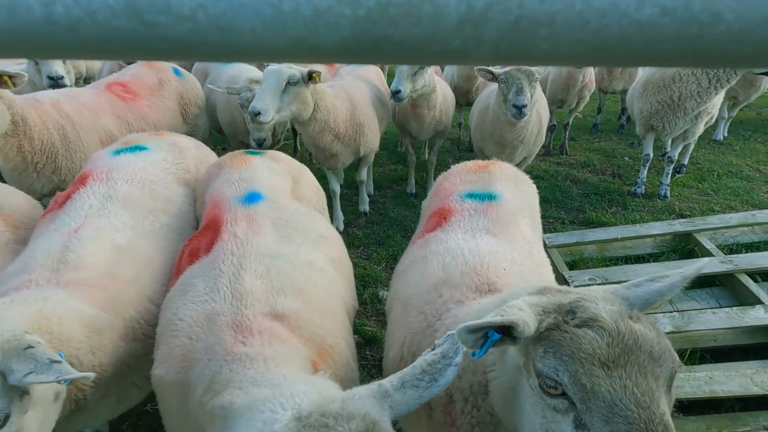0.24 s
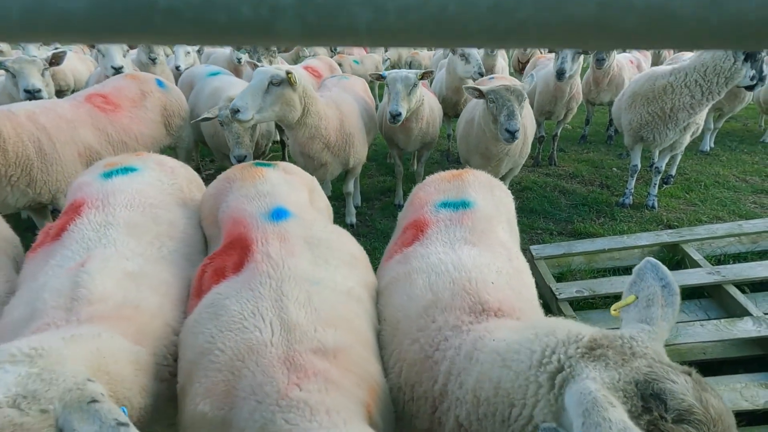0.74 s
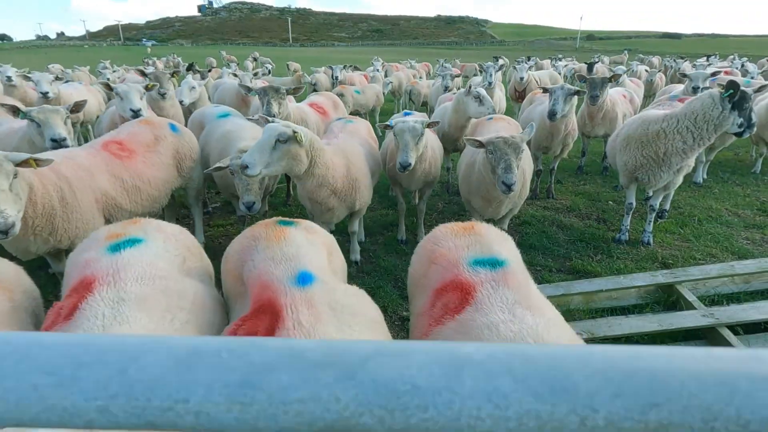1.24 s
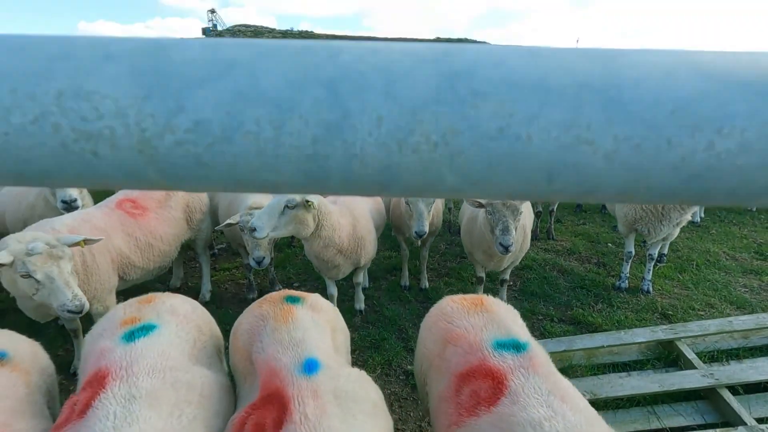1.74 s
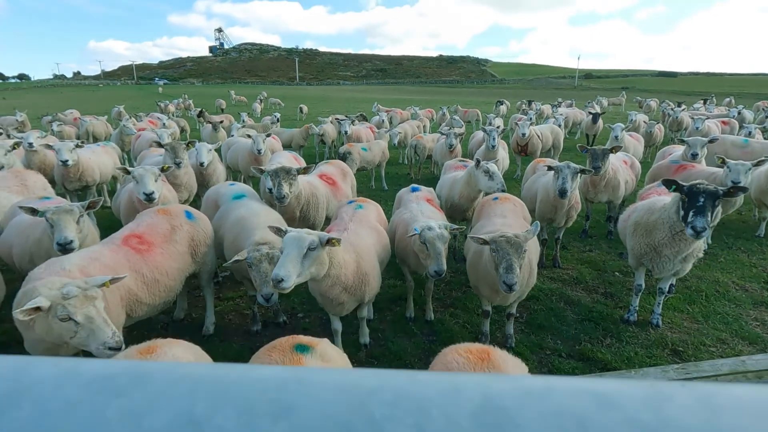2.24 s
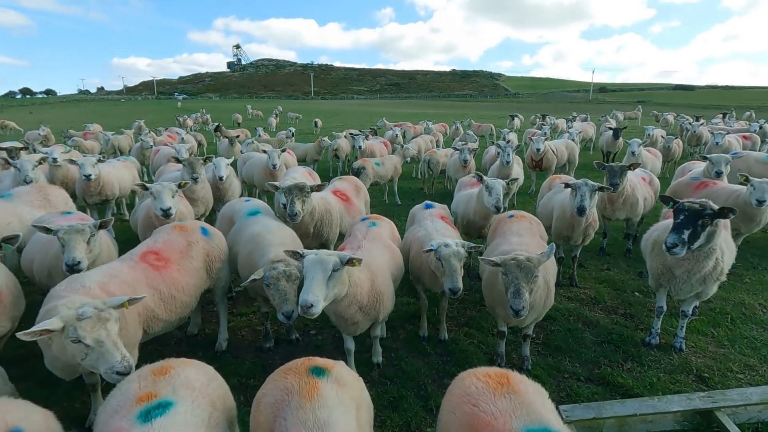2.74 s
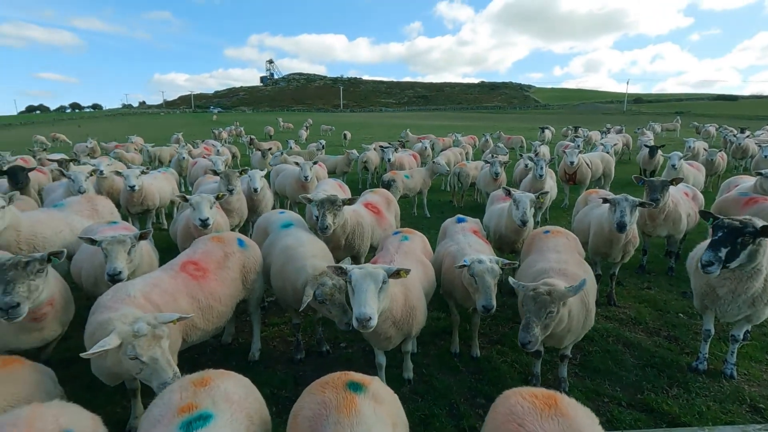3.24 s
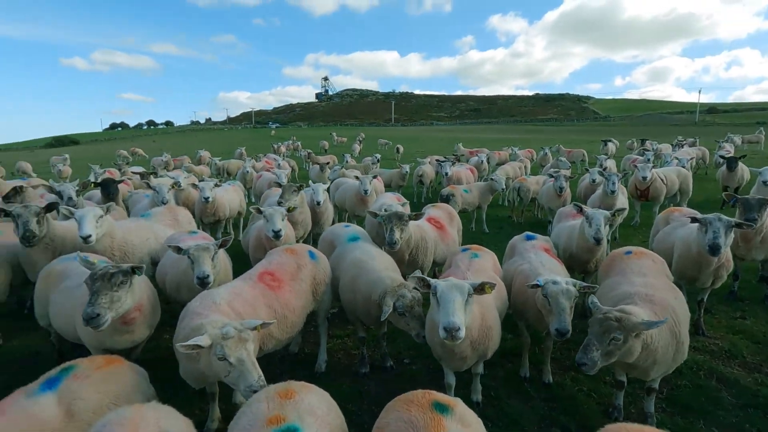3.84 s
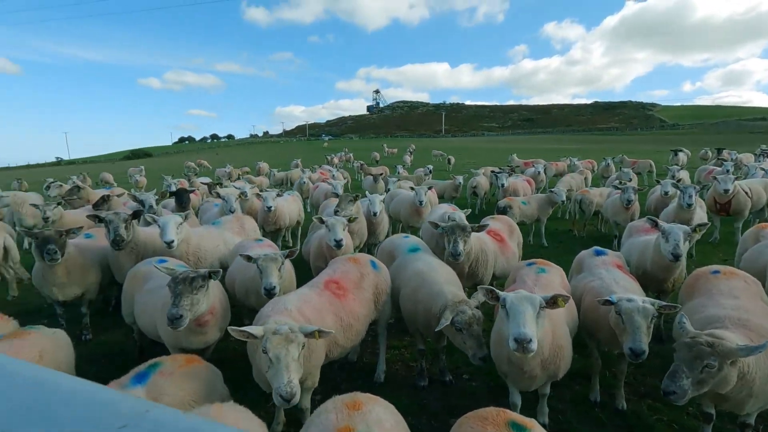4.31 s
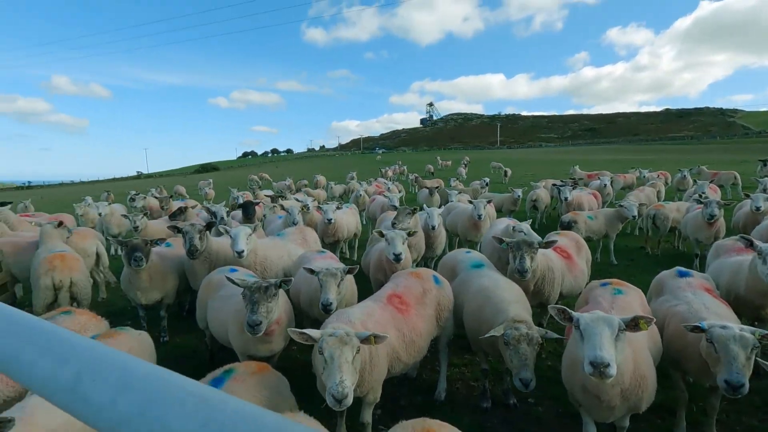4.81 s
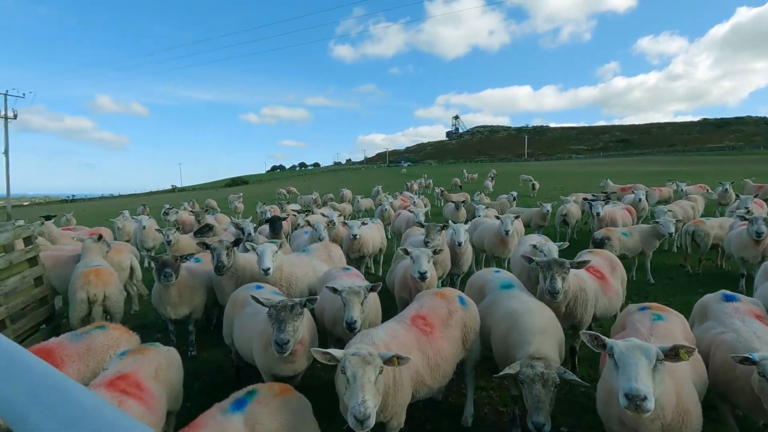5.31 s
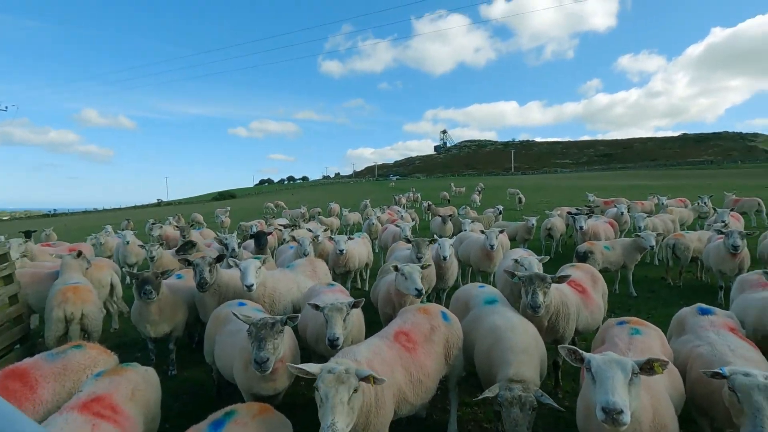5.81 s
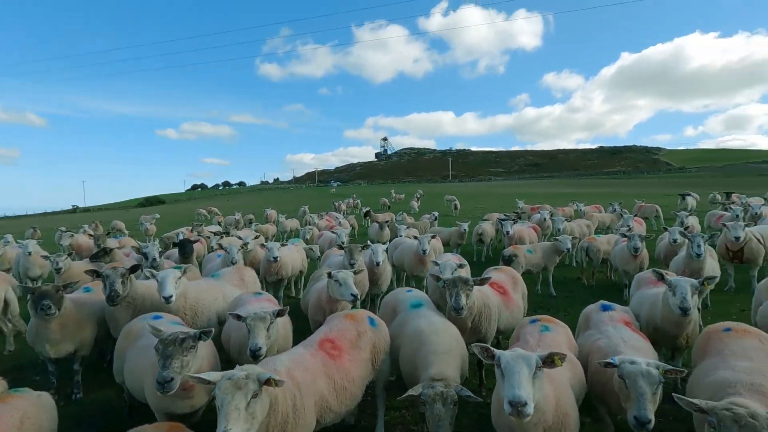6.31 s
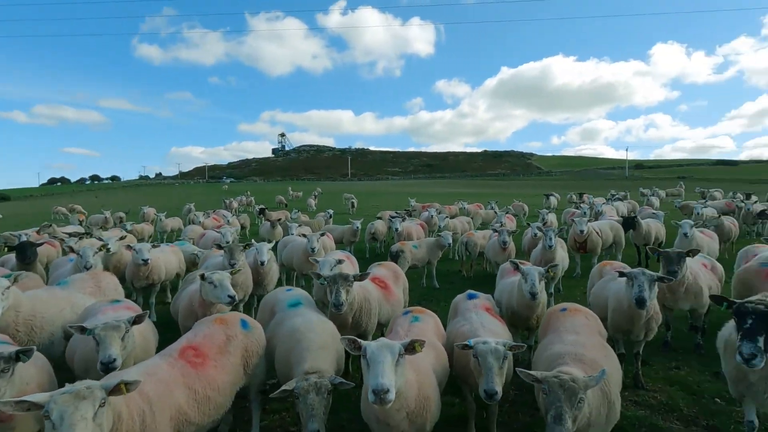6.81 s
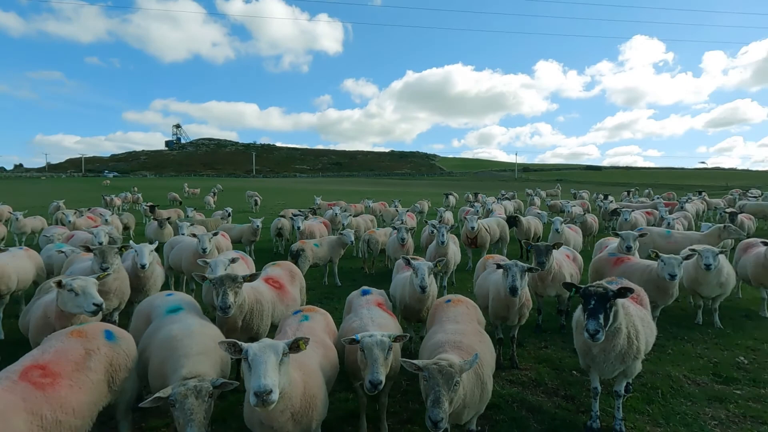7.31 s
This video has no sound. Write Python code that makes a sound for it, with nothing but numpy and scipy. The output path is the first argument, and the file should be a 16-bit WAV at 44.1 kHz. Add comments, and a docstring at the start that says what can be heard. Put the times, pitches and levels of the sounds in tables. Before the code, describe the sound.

Low buffeting wind swells into a hard blow, drops away and returns, over soft fleece rustle, tiny snaps and hooves knocking on ground and wood.

```python
"""A flock of sheep mills about on a pasture in gusty wind.
From the start, noise pressed on two ports rumbles and sputters; grainy noise rustles as fleece and grass,
dull far steps patter over a field wash, and short noise cracks snap as stalks.
Hoof knocks (struck modes) join from 0.3 s, pause after 3.4 s and return at 5.6 s; scuffs join at 0.6 s.
The wind builds to a long blow at 3.3-4.5 s, dies away by 5.6 s and picks up again."""
import sys
import numpy as np
from scipy import signal
from scipy.fft import rfft, irfft, next_fast_len
from scipy.io import wavfile
from scipy.ndimage import uniform_filter1d

SR = 44100
rng = np.random.default_rng(int(sys.argv[2]) if len(sys.argv) > 2 else 0)


def dump(signal):
    """Clip the signal to [-1, 1] and save it as 16-bit WAV at the path in sys.argv[1]."""
    limited = np.clip(np.atleast_2d(signal).T, -1, 1)
    pcm = np.round(limited * 32767).astype(np.int16)
    wavfile.write(sys.argv[1], SR, pcm)


N = 332955
TIME = np.arange(N) / SR
SIDES = np.array([[.5], [-.5]])  # left and right halves of a left-right difference

# Levels in the tables are relative: the functions trim them.
# slow wind: t/s, buffeting/dB, rumble/dB, extra on the rumble's upper part/dB
WIND = [(0.0, -49.5, -26, -1), (0.65, -48.5, -25.5, -0.5), (1.35, -49, -26, -1), (1.95, -42, -28, 2.5),
        (2.12, -54.5, -20, -5), (2.5, -45.5, -17, -9.5), (2.9, -38, -23.5, -2), (3.3, -28.5, -19, 1),
        (3.7, -28.5, -16.5, -3), (4.45, -33, -19.5, -0.5), (4.85, -38.5, -23, -2.5),
        (5.4, -45.5, -25, -3.5), (5.55, -67, -28.5, 4.5), (6.03, -63, -29.5, -4.5),
        (6.18, -41.5, -26, -0.5), (6.65, -38.5, -21.5, 1), (7.15, -39.5, -25, -2), (7.5, -39, -14, -15)]
# puffs on the wind: middle t/s, length/s, buffeting/dB, rumble/dB
PUFFS = [(0.125, 0.074, -35.5, -12.5), (0.276, 0.034, -40.5, -27), (0.398, 0.036, -40, -18),
         (0.494, 0.033, -33.5, -17.5), (0.722, 0.016, -39, -16.5), (0.788, 0.039, -43.5, -50),
         (0.884, 0.25, -45, -48), (1.012, 0.11, -46.5, -19.5), (1.111, 0.052, -42.5, -25),
         (1.226, 0.064, -33.5, -48), (1.443, 0.066, -31.5, -20), (1.642, 0.057, -29.5, -28),
         (2.25, 0.12, -40, -42), (2.553, 0.067, -32, -25), (2.77, 0.11, -32.5, -21),
         (3.009, 0.1, -26, -16.5), (3.111, 0.081, -34, -32), (5.406, 0.093, -41.5, -17),
         (5.601, 0.047, -34.5, -24.5), (5.735, 0.029, -50, -21), (5.87, 0.051, -45.5, -15.5),
         (6.132, 0.052, -35.5, -55), (6.309, 0.14, -35.5, -22.5), (6.807, 0.041, -42.5, -19)]
# brief lulls: middle t/s, length/s, depth/dB (negative: a rise)
LULLS = [(0.31, 0.11, 13), (0.631, 0.04, 26), (1.707, 0.024, 22.5), (3.199, 0.036, 18.5),
         (3.472, 0.042, 3.5), (3.731, 0.013, -3.5), (3.826, 0.018, 4), (3.878, 0.029, 2.5),
         (4.059, 0.022, 4.5), (4.141, 0.031, 3.5), (4.286, 0.019, 12.5), (4.387, 0.032, 2.5),
         (4.435, 0.02, 6), (4.589, 0.086, 25.5), (5.184, 0.035, 21.5), (5.538, 0.098, 22.5),
         (5.797, 0.056, 23.5), (6.398, 0.059, 30.5), (6.798, 0.016, 17.5), (6.937, 0.035, 0),
         (7.263, 0.025, 0)]
# side the rumble presses on, right to left and back: t/s, left-right/dB
WIND_SIDE = [(0.0, -3), (2.3, -2.5), (4.0, -0.5), (4.8, 4), (7.5, -1)]
# rumble spectrum: f/Hz, level/dB per Hz
RUMBLE_COLOUR = [(8, -16.5), (20, -1), (33, -1.5), (55, -3), (85, -6.5), (130, -14.5), (200, -20.5),
                 (350, -60), (700, -99)]
# share of each pitch counted as the rumble's upper part: f/Hz, share/1
RUMBLE_UPPER = [(45, 0), (90, 1)]
# single strong eddies: t/s, peak level/dB, decay/s
EDDIES = [(0.004, -26.5, 0.01), (0.074, -26.5, 0.012), (0.123, -21, 0.016), (0.234, -25, 0.015),
          (0.255, -22.5, 0.006), (0.41, -34, 0.01), (0.457, -23.5, 0.022), (0.494, -33, 0.046),
          (0.778, -23.5, 0.0037), (1.421, -27.5, 0.041), (1.456, -26, 0.011), (1.488, -22.5, 0.004),
          (1.527, -26.5, 0.0089), (1.842, -21.5, 0.0095), (1.986, -28.5, 0.045), (2.269, -23, 0.0068),
          (2.514, -23.5, 0.013), (2.739, -22, 0.011), (2.767, -24.5, 0.01), (2.971, -19.5, 0.006),
          (2.986, -16, 0.0065), (3.108, -21, 0.013), (3.216, -18.5, 0.0063), (3.247, -15.5, 0.017),
          (3.272, -11.5, 0.0071), (3.291, -17.5, 0.011), (3.327, -22, 0.021), (3.351, -16.5, 0.0061),
          (3.431, -25.5, 0.011), (3.5, -13, 0.012), (3.549, -16, 0.0063), (3.566, -18, 0.036),
          (3.613, -11.5, 0.0087), (3.663, -17, 0.011), (3.687, -10, 0.0051), (3.737, -13, 0.005),
          (3.781, -3.5, 0.0055), (3.807, -12.5, 0.0078), (3.85, -12.5, 0.0046), (3.899, -14, 0.0033),
          (3.921, -17.5, 0.013), (3.959, -16.5, 0.008), (3.987, -18, 0.023), (4.04, -18.5, 0.004),
          (4.048, -16.5, 0.005), (4.08, -15.5, 0.0062), (4.107, -16.5, 0.0026), (4.148, -9, 0.004),
          (4.166, -21, 0.02), (4.223, -15.5, 0.0037), (4.273, -18.5, 0.007), (4.325, -19, 0.0033),
          (4.34, -15, 0.007), (4.397, -15.5, 0.0089), (4.449, -18, 0.012), (4.72, -18.5, 0.01),
          (4.745, -24, 0.039), (4.841, -28.5, 0.033), (4.917, -28.5, 0.03), (5.104, -21.5, 0.0071),
          (5.142, -12.5, 0.0062), (5.21, -20.5, 0.0091), (5.236, -28.5, 0.0092), (5.306, -25, 0.027),
          (5.574, -22.5, 0.0087), (5.758, -27.5, 0.0062), (6.137, -25, 0.0044), (6.274, -27.5, 0.0087),
          (6.291, -39.5, 0.0057), (6.338, -22.5, 0.0065), (6.606, -23, 0.015), (6.644, -25, 0.0046),
          (6.676, -25, 0.009), (6.716, -19, 0.012), (6.789, -17.5, 0.0059), (6.81, -17.5, 0.007),
          (6.838, -18.5, 0.012), (6.87, -19.5, 0.011), (6.95, -24.5, 0.0087), (6.97, -23, 0.0077),
          (7.102, -22, 0.0092), (7.131, -24.5, 0.018), (7.174, -19, 0.026), (7.266, -21, 0.0054)]
# buffeting spectrum: f/Hz, level/dB per Hz
GUST_COLOUR = [(40, -15), (70, 13), (110, 8), (180, 8.5), (300, 5.5), (500, -1.5), (750, -10.5),
               (1100, -22.5), (1600, -39.5), (2300, -53), (3300, -66), (6000, -87)]
# how strongly each pitch follows the gusts: f/Hz, slope/(dB per dB)
GUST_GRIP = [(100, 0.85), (250, 0.4452), (500, 1), (1000, 2.06), (2000, 2.5)]
# port level difference in gusts: f/Hz, left-right/dB
GUST_BALANCE = [(100, -2.5), (200, -5), (500, -6), (750, -5.5), (1140, 0), (1740, 1), (2650, 4.5)]
# port phase difference in gusts: f/Hz, left lead/rad
GUST_PHASE = [(80, -1.45), (180, -1.49), (1200, -1.55), (2600, -1.3)]
# stirring of the flock: t/s, rustle level/dB
STIR = [(0.0, -66.5), (0.9, -67), (1.7, -70.5), (2.45, -72.5), (3.55, -71), (4.05, -73.5), (4.6, -66),
        (5.2, -75.5), (5.6, -72), (6.9, -77), (7.5, -78.5)]
# single brushes of fleece and grass: middle t/s, length/s, level/dB, crispness (treble)/dB
BRUSHES = [(0.154, 0.08, -60, -2), (0.542, 0.13, -81, 19), (0.83, 0.24, -63.5, -12), (1, 0.17, -62, -15),
           (1.22, 0.18, -63, 1), (1.946, 0.035, -61, -5), (2.762, 0.087, -68, -24), (3.055, 0.07, -60, -8),
           (3.252, 0.04, -62.5, -4), (4.132, 0.03, -59.5, -27), (4.46, 0.048, -67, -13),
           (5.024, 0.27, -64.5, -18), (5.34, 0.23, -67, 2), (5.96, 0.26, -67, -7), (6.206, 0.14, -69, 1),
           (6.537, 0.087, -71, -6), (7.077, 0.18, -71.5, -19)]
# rustle spectrum: f/Hz, level/dB per Hz
RUSTLE_COLOUR = [(200, 14), (600, -4), (1300, 11.5), (2000, 7), (3000, 3), (5000, 3.5), (7000, 0.5),
                 (8500, -8.5), (12000, -15.5), (14000, -38)]
# share of each pitch counted as the rustle's top: f/Hz, share/1
RUSTLE_TOP = [(7000, 0.039), (9500, 0.46)]
# distant steps, spectrum: f/Hz, level/dB per Hz
TREAD_COLOUR = [(150, -9.5), (500, -22), (1200, 16), (2000, 8), (3000, -29), (6000, -33)]
# open field wash, spectrum: f/Hz, level/dB per Hz
FIELD_COLOUR = [(100, -15), (500, 15), (1000, 12.5), (1500, 8.5), (2500, -2), (4000, -35.5), (7000, -8),
                (9000, -35), (14000, -29)]
# stalks and grit snapping underfoot: t/s, peak level/dB, centre f/Hz, decay/s
SNAPS = [(0.0155, -38, 5300, 0.01), (0.158, -42, 5940, 0.003), (0.348, -33, 8200, 0.00091),
         (0.4324, -42, 7000, 0.003), (0.442, -41.5, 5000, 0.007), (0.459, -43, 7000, 0.0022),
         (0.648, -42, 5980, 0.004), (1.017, -42, 5760, 0.0093), (1.191, -40, 6500, 0.007),
         (1.686, -49, 5800, 0.0045), (1.8315, -50, 6200, 0.0027), (1.911, -48, 6550, 0.005),
         (1.9544, -48, 6000, 0.004), (2.102, -53.5, 6630, 0.0057), (2.617, -44, 6460, 0.0032),
         (3.2444, -51, 6240, 0.004), (3.753, -48, 9780, 0.0063), (3.891, -47.5, 7000, 0.011),
         (4.123, -52, 6430, 0.004), (4.23, -37.5, 6300, 0.0028), (4.312, -42, 5700, 0.0034),
         (4.4025, -47, 5800, 0.004), (4.616, -44, 7000, 0.002), (4.6558, -48, 6740, 0.003),
         (4.7144, -43, 5740, 0.0048), (4.815, -50, 5200, 0.003), (4.946, -37.5, 4470, 0.004),
         (5.313, -44, 5700, 0.004), (5.9744, -45, 7210, 0.004), (7.2399, -51, 7200, 0.002)]
# hoof knocks: t/s, level/dB, main ring f/Hz, upper ring f/Hz, upper ring level/dB, gritty clack level/dB,
# wooden slats level/dB, ring length factor/1, rocking time/s, left-right/dB
HOOVES = [(0.286, -52, 1500, 2260, -11, -8, -11, 0.71, 0.0014, 9),
          (0.3035, -49.5, 1300, 1790, -17, -16, -16, 1.6, 0.00093, 7),
          (0.591, -48, 1420, 2120, -14, -25, -8, 0.61, 0.0004, 1),
          (0.684, -59, 3300, 5300, 17, 0, -16, 1.0, 0.00081, -2),
          (0.72, -51, 1840, 2400, -11, -21, -14, 0.99, 0.0004, 1),
          (0.7496, -45, 1820, 2480, -10, -25, -16, 1.1, 0.0005, 1),
          (0.808, -39, 1220, 1850, 11, -29, -24, 1.4, 0.00053, 1),
          (0.973, -41, 1590, 2620, -13, -25, -26, 1.1, 0.0014, -2),
          (1.231, -47, 1640, 2160, 2, -18, -17, 0.92, 0.0021, -1),
          (1.5401, -43, 1650, 1950, -9, -12, -4, 0.37, 0.00085, -1),
          (1.5641, -36.5, 1480, 1890, -6, -13, -11, 0.4, 0.00033, 1),
          (1.622, -37, 1680, 2350, -20, -25, -19, 0.83, 0.0003, -0.5),
          (1.656, -30, 1790, 2400, -16, -16, -7, 0.75, 0.0012, 0.5),
          (2.103, -58, 2900, 3400, -2, 8, -13, 0.62, 0.002, 14),
          (2.1502, -48.5, 1710, 2940, 17, -14, -1.5, 0.16, 0.0026, 12),
          (2.23, -59, 2650, 2900, -8, -7, -15, 1.1, 0.002, -3),
          (2.754, -51, 2400, 3150, 11, -13, -8, 0.9, 0.0032, 10),
          (3.008, -37.5, 1600, 2320, 8, -18, -18, 0.49, 0.00066, 0),
          (3.025, -30, 1330, 2400, -2, -24, -17, 0.75, 0.0018, -4),
          (3.0589, -27, 1370, 2420, -7, -17.5, -21, 0.75, 0.00088, -3),
          (3.382, -41, 1200, 2280, 1, -14.5, -6, 2.2, 0.0043, 11),
          (5.636, -54, 1200, 2360, -15, -8, -5, 0.7, 0.0017, 4),
          (6.139, -50, 1600, 3100, -10, 1, -4, 0.82, 0.0028, 6),
          (6.1747, -37.5, 1150, 3170, 11, -8.5, -15, 2.1, 0.003, 4.5),
          (6.482, -53, 1500, 3180, 4, -6.5, -15.5, 0.32, 0.0031, 11),
          (6.5187, -41.5, 1220, 3320, -20, -21, -21, 3.1, 0.0031, 6)]
# hoof modes: multiple of the main ring/1, level/dB, t60/s (times the ring length factor in a knock)
HOOF_MODES = [(1, 8.5, 0.012), (0.7, -11, 0.0081), (1.37, -14, 0.011), (1.83, -23.5, 0.0052)]
# band in which a hoof rings: f/Hz, gain/dB
KNOCK_COLOUR = [(300, -10.5), (1000, 11), (2700, 7.5), (3600, -19), (5000, -4.5), (9000, -32)]
# gritty clack of a hoof, filter: f/Hz, gain/dB
CLACK_COLOUR = [(300, -31), (1000, 6), (2000, -2.5), (3400, 5.5), (4200, -6.5), (5400, 0), (7000, -10),
                (9000, -30), (14000, -42)]
# modes of wooden slats lying in the grass: f/Hz, level/dB, t60/s
SLAT_MODES = [(1120, 11.5, 0.035), (1700, -6.5, 0.016), (2400, -29.5, 0.016), (3600, -1, 0.016),
              (5000, -19.5, 0.0088)]
# band in which the slats sound: f/Hz, gain/dB
SLAT_COLOUR = [(300, -6.5), (900, -3.5), (2000, 8.5), (3000, -12.5), (3800, 1.5), (5400, -2.5),
               (7000, -16.5), (12000, -34)]
# hooves dragged over the ground: t/s, peak level/dB, ring f/Hz, length/s
SCUFFS = [(0.632, -48.5, 2050, 0.018), (0.667, -61, 1150, 0.0074), (0.81, -52, 1170, 0.014),
          (0.916, -52, 1800, 0.017), (0.946, -47.5, 1130, 0.023), (2.733, -47.5, 1120, 0.022),
          (4.697, -54, 1200, 0.014), (4.93, -55, 1330, 0.022), (6.991, -62, 1150, 0.019),
          (7.124, -54.5, 1090, 0.0074)]
# scuff filter: f/Hz, gain/dB
SCUFF_COLOUR = [(300, -10.0), (800, 0.0), (1250, -9.5), (2400, 11.5), (3600, 2.5), (5500, -18.0),
                (9000, -25.0), (14000, -44.0)]


def amp(db):
    """Decibels to gain."""
    return 10 ** (np.asarray(db) / 20)


def evened(x):
    """Scales to rms 1."""
    return x / np.sqrt(np.mean(x ** 2) + 1e-20)


def unit(x):
    """Scales to energy 1 per channel, averaged over the channels."""
    return evened(x) / np.sqrt(x.shape[-1])


def read(points, f_hz):
    """A table's value on a log-frequency axis."""
    f, value = np.transpose(points)
    return np.interp(np.log(f_hz + 1), np.log(f + 1), value)


def curve(rows, axis=1):
    """One column of a time table, at every sample."""
    rows = np.asarray(rows)
    return np.interp(TIME, rows[:, 0], rows[:, axis])


def hump(middle_s, length_s):
    """Smooth rise and fall of height 1; width at half height is the length plus 1 ms."""
    return 2. ** -np.minimum((2 * (TIME - middle_s) / (length_s + 1e-3)) ** 2, 60)


def shaped(x, gain):
    """Filters by a gain given as a function of frequency."""
    size = next_fast_len(x.shape[-1])
    spectrum = rfft(x, size) * gain(np.fft.rfftfreq(size, 1 / SR))
    return irfft(spectrum, size)[..., :x.shape[-1]]


def coloured(x, points):
    """Filters by a table of f/Hz, gain/dB, then scales to rms 1."""
    return evened(shaped(x, lambda f_hz: amp(read(points, f_hz))))


def flutter(rate_hz):
    """Random wavering up to a rate, at rms 1."""
    return evened(shaped(rng.standard_normal(N), lambda f_hz: 1 / np.sqrt(1 + (f_hz / rate_hz) ** 4)))


def pair(likeness, size=N):
    """Two partly alike channels of white noise."""
    common, left, right = rng.standard_normal((3, size))
    return np.sqrt(likeness) * common + np.sqrt(1 - likeness) * np.array([left, right])


def panned(db):
    """Left and right gains for a level difference, fixed or per sample."""
    return amp(SIDES * db)


def add(mix, start_s, sound):
    """Mixes a sound in at a time."""
    part = mix[..., max(round(start_s * SR), 0):][..., :sound.shape[-1]]
    part += sound[..., :part.shape[-1]]


def ringing(drive, modes):
    """What a set of modes (f/Hz, level/dB, t60/s) makes of a force."""
    t = np.arange(drive.shape[1]) / SR
    ring = sum(amp(db - 60 * t / t60_s) * np.cos(2 * np.pi * f_hz * t) for f_hz, db, t60_s in modes)
    return signal.fftconvolve(drive, ring[None], axes=1)[:, :len(t)]


def mottled(x, patchy_db):
    """Lets the colour shift: bands some 350 Hz wide swell and sink for a tenth of a second each."""
    z = signal.stft(x, nperseg=1024, noverlap=768)[2]
    patches = rng.standard_normal(z.shape[1:])
    patches = uniform_filter1d(patches, size=8, axis=0)
    patches = evened(uniform_filter1d(patches, size=18, axis=1))
    return evened(signal.istft(z * amp(patchy_db * patches), nperseg=1024, noverlap=768)[1][:, :N])


def wind(rumble_lull_share=0.26):
    """Buffeting and rumble levels in dB: slow wind, less its lulls (weaker in the rumble), plus its puffs."""
    lull_db = sum(depth_db * hump(s, length_s) for s, length_s, depth_db in LULLS)
    buffet_power = amp(curve(WIND) - lull_db) ** 2
    rumble_power = amp(curve(WIND, axis=2) - rumble_lull_share * lull_db) ** 2
    for s, length_s, buffet_db, rumble_db in PUFFS:
        puff = hump(s, length_s)
        buffet_power = buffet_power + (amp(buffet_db) * puff) ** 2
        rumble_power = rumble_power + (amp(rumble_db) * puff) ** 2
    return 10 * np.log10(buffet_power), 10 * np.log10(rumble_power)


def rumble(pressure_db, trim_db=-0.6, lumpy_db=2.0, wander_db=0.1, upper_trim_db=-1.0, bumpy_db=3.0,
           ceiling=0.33):
    """Large eddies press on both ports, only partly alike, bump unevenly and wander from side to side."""
    low = coloured(pair(likeness=0.74), RUMBLE_COLOUR)
    swell = np.sqrt(uniform_filter1d((low ** 2).mean(0), size=3500))
    upper_db = curve(WIND, axis=3) + upper_trim_db + bumpy_db * flutter(rate_hz=13.0)
    low = low + (amp(upper_db) - 1) * shaped(low, lambda f_hz: read(RUMBLE_UPPER, f_hz))
    side_db = curve(WIND_SIDE) + wander_db * flutter(rate_hz=4.1)
    level_db = pressure_db + trim_db + lumpy_db * flutter(rate_hz=5.5)
    pressure = low / swell * panned(side_db) * amp(level_db)
    return ceiling * np.tanh(pressure / ceiling)  # the strongest pushes level off


def buffet(gust_db, gust_trim_db=2.0, usual_db=-33, sputter_db=3.0, lumpy_db=2.1, eddy_trim_db=-4.0,
           trim_db=2.5, onset_s=0.0017, ceiling_db=11.0, knee_db=4.0):
    """Small eddies break at the ports in lumps: the stronger the gust, the higher its sputter reaches."""
    power = amp(gust_db + gust_trim_db) ** 2
    for s, db, decay_s in EDDIES:
        age_s = np.maximum(TIME - s, 0)
        burst = (1 - np.exp(-age_s / onset_s)) * np.exp(-np.minimum(age_s / (decay_s + 1e-4), 20))
        power = power + (amp(db + eddy_trim_db) * burst / burst.max()) ** 2
    force_db = 10 * np.log10(power) - usual_db
    force_db = force_db + sputter_db * flutter(rate_hz=143) + lumpy_db * flutter(rate_hz=7.2)
    # the fiercest peaks level off
    force_db = force_db - knee_db * np.logaddexp(0, (force_db - ceiling_db) / knee_db)
    air = coloured(pair(likeness=0.99), GUST_COLOUR)
    out = np.zeros((2, N))
    for centre_hz in 50 * 2. ** np.arange(8):
        octave = shaped(air, lambda f_hz: np.maximum(1 - abs(np.log2((f_hz + 1e-3) / centre_hz)), 0))
        out += octave * amp(read(GUST_GRIP, centre_hz) * force_db + usual_db + trim_db)

    def port_gain(f_hz):
        """Nearly the same sound at both ports, about a quarter cycle apart."""
        return panned(read(GUST_BALANCE, f_hz)) * np.exp(1j * SIDES * read(GUST_PHASE, f_hz))

    return shaped(out, port_gain)


def rustle(grains_per_s=900, grain_db=3.0, rub=1.0, patchy_db=1.5, usual_top_db=-11, trim_db=3.0,
           unsteady_db=2.96):
    """Fleeces rub (steady noise) and grass crackles (random grains) underfoot; crisp brushes add treble."""
    grain_size = amp(grain_db * np.minimum(rng.exponential(1, N), 5))
    grains = grain_size * (rng.random(N) < grains_per_s / SR)
    crackle = evened(grains * pair(likeness=0.63))
    sound = coloured(.5 * crackle + rub * pair(likeness=0.62), RUSTLE_COLOUR)
    sound = mottled(sound, patchy_db)
    top = shaped(sound, lambda f_hz: read(RUSTLE_TOP, f_hz))
    body_power = top_power = amp(curve(STIR)) ** 2
    for s, length_s, db, crisp_db in BRUSHES:
        brush = amp(db) * hump(s, length_s)
        body_power = body_power + brush ** 2
        top_power = top_power + (brush * amp(crisp_db - usual_top_db)) ** 2
    sound = (sound - top) * np.sqrt(body_power) + top * np.sqrt(top_power)
    return sound * amp(trim_db + unsteady_db * flutter(rate_hz=14.0)) * panned(db=1.5)


def far_flock(steps_per_s=16, step_decay_s=0.019, step_db=-70, wash_db=-65):
    """Dull steps (decaying noise at random times) from farther off, over the soft wash of the open field."""
    t = np.arange(3000) / SR
    steps = (rng.random(N) < steps_per_s / SR) * rng.uniform(0.071, 1, N)
    treads = signal.oaconvolve(steps, np.exp(-t / step_decay_s))[:N] * pair(likeness=1.0)
    wash = coloured(pair(likeness=0.11), FIELD_COLOUR)
    return amp(step_db) * coloured(treads, TREAD_COLOUR) + amp(wash_db) * wash


def snaps(trim_db=-5.0, width_octaves=0.44):
    """Tiny bright cracks of stalks and grit: band noise that starts at once and decays."""
    out, t = np.zeros((2, N)), np.arange(3000) / SR
    for s, db, centre_hz, decay_s in SNAPS:
        def band(f_hz):
            return np.exp(-.5 * (np.log2((f_hz + 1) / centre_hz) / width_octaves) ** 2)
        crack = shaped(pair(likeness=0.17, size=len(t)), band) * np.exp(-t / (decay_s + 1e-4))
        add(out, s, amp(db + trim_db) * crack / abs(crack).max())
    return out * panned(db=3)


def hooves(rock_db=-18, crumble_db=-47, crumble_s=0.04, upper_t60_s=0.024, knock_s=0.005):
    """A strike, rocking on grit and crumbling ground ring the hoof, clack, and may sound the slats."""
    out, t = np.zeros((2, N)), np.arange(-256, 4096) / SR  # lead-in for the filters' early ripple
    since_s = np.maximum(t, 0)
    for s, db, hz, upper_hz, upper_db, clack_db, slats_db, sustain, rock_s, side_db in HOOVES:
        age = since_s / (rock_s + 1e-5)
        strike = t == 0
        rocking = amp(rock_db) * pair(likeness=0.76, size=len(t)) * age * np.exp(1 - age)
        crumble = amp(crumble_db) * pair(likeness=0.83, size=len(t)) * np.exp(-since_s / crumble_s) * (t > 0)
        force = strike + rocking + crumble
        modes = [(hz * k, level_db, t60_s * sustain) for k, level_db, t60_s in HOOF_MODES]
        modes.append((upper_hz, upper_db, upper_t60_s * sustain))
        ring = unit(coloured(ringing(force, modes), KNOCK_COLOUR))
        clack = unit(coloured(force, CLACK_COLOUR))
        slats = unit(coloured(ringing(force, SLAT_MODES), SLAT_COLOUR))
        knock = unit(ring + amp(clack_db) * clack + amp(slats_db) * slats)
        # the level is the knock's energy spread over knock_s
        add(out, s + t[0], amp(db) * np.sqrt(knock_s * SR) * knock * panned(side_db))
    return out


def scuffs(ring_db=-28, grit_db=4):
    """A dragged hoof catches on grit many times, each catch ringing it faintly."""
    out, t = np.zeros((2, N)), np.arange(6000) / SR
    for s, db, hz, length_s in SCUFFS:
        age = t / (length_s / 2 + 1e-4)
        catches = amp(grit_db * np.repeat(rng.standard_normal(100), 60))  # a new strength every 60 samples
        drag = pair(likeness=0.95, size=len(t)) * catches * age * np.exp(1 - age)
        modes = [(hz * k, level_db, t60_s) for k, level_db, t60_s in HOOF_MODES]
        drag = coloured(drag + amp(ring_db) * ringing(drag, modes), SCUFF_COLOUR)
        add(out, s, amp(db) * drag / abs(drag).max())
    return out * panned(db=13.0)


def scene():
    """Wind at the microphone over the shuffling flock."""
    gust_db, pressure_db = wind()
    weather = rumble(pressure_db) + buffet(gust_db)
    return weather + rustle() + far_flock() + snaps() + hooves() + scuffs()


def record(dry, edge_hz=13800):
    """Band limit: a steep linear-phase low-pass."""
    lowpass = signal.firwin(511, edge_hz, window=("kaiser", 9), fs=SR)
    return signal.oaconvolve(dry, lowpass[None], "same")


dry = scene()
out = record(dry)
dump(out)
```